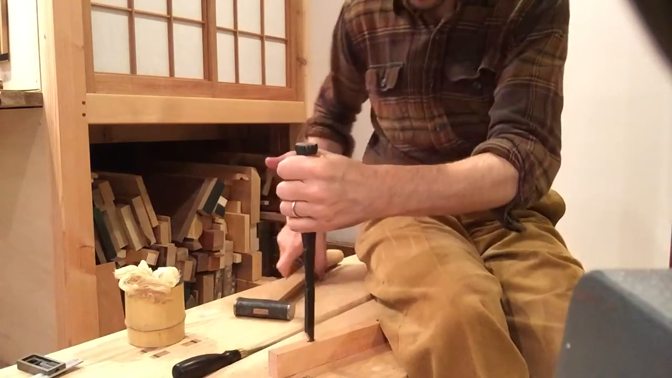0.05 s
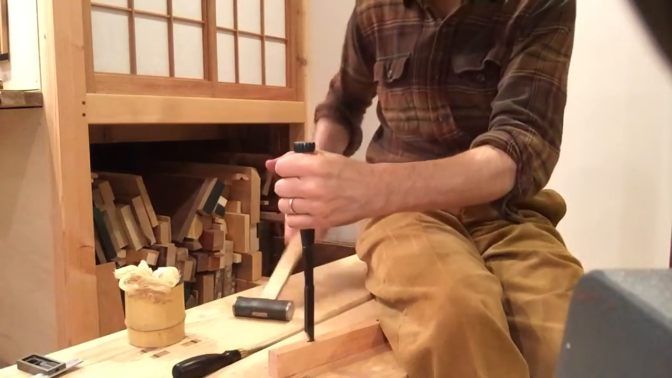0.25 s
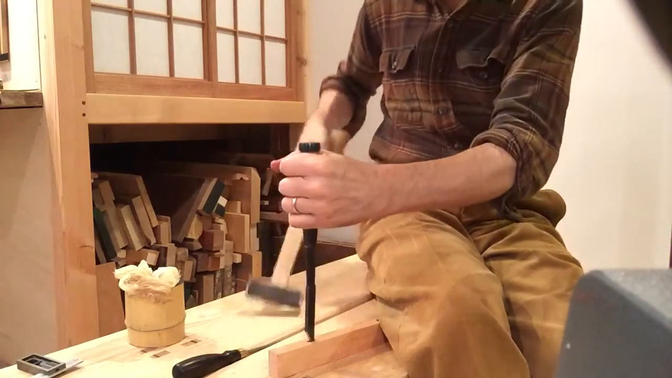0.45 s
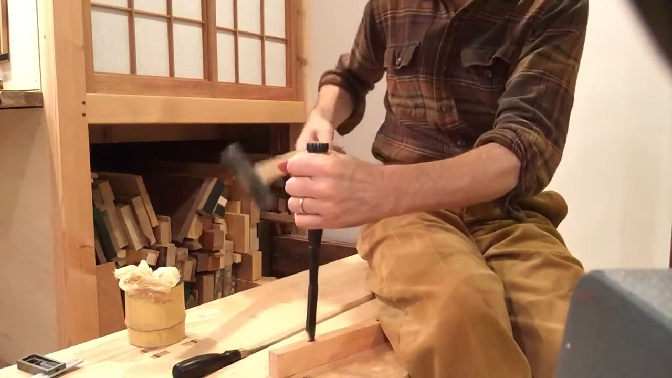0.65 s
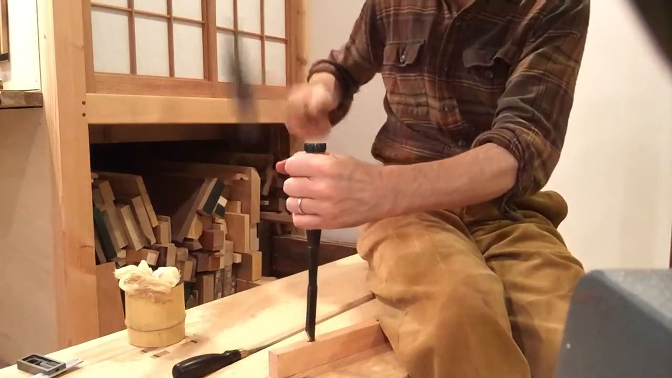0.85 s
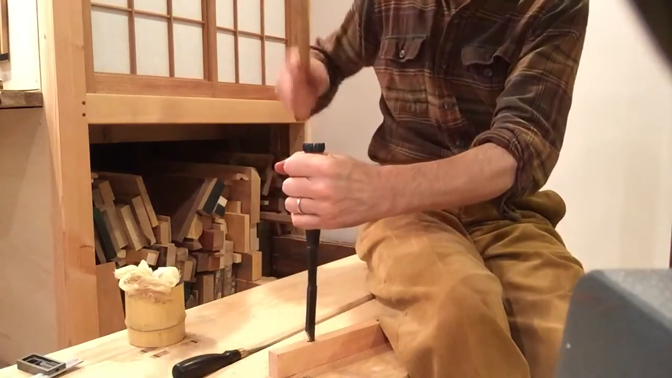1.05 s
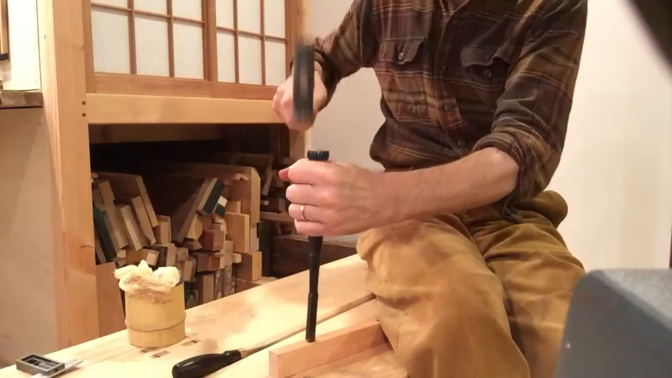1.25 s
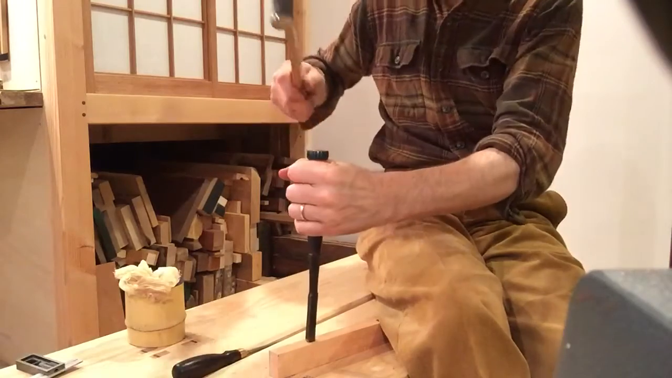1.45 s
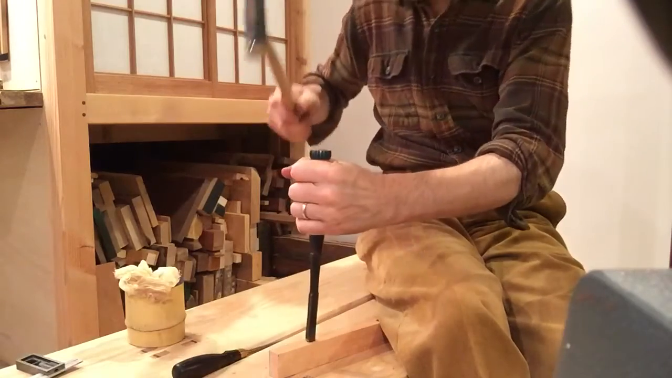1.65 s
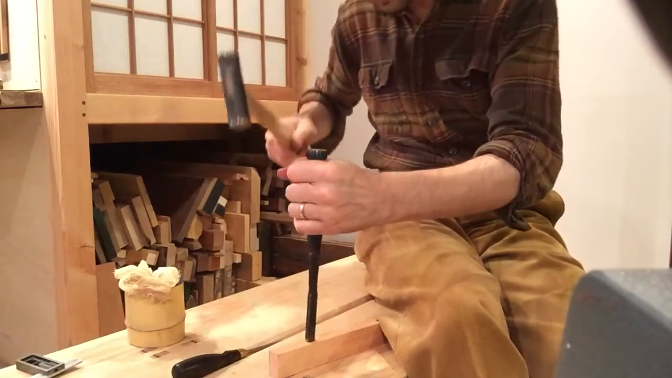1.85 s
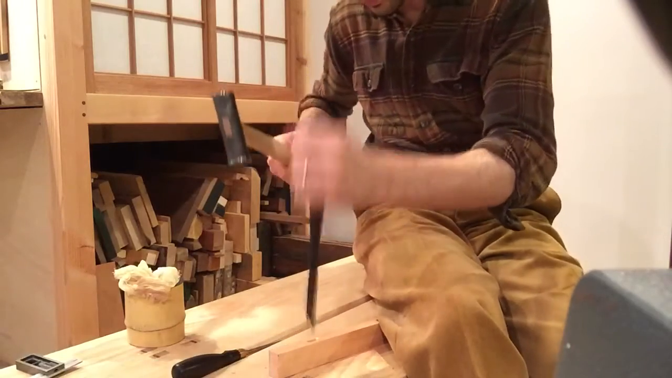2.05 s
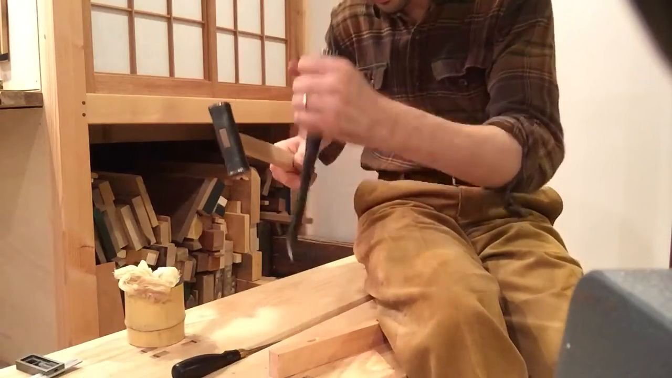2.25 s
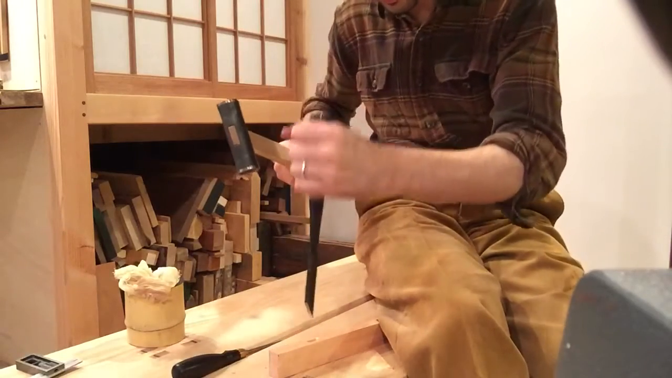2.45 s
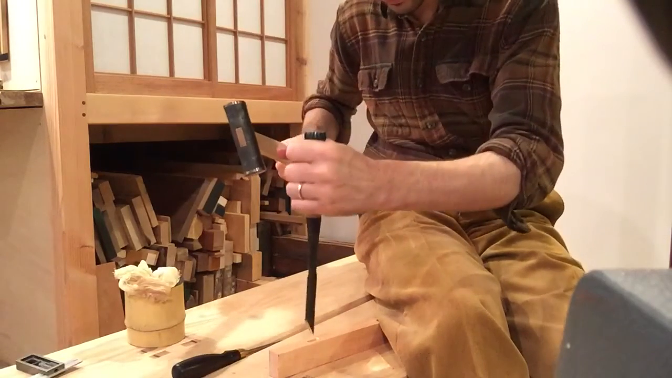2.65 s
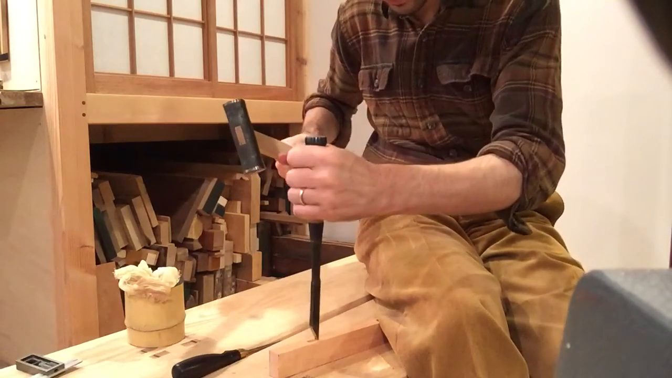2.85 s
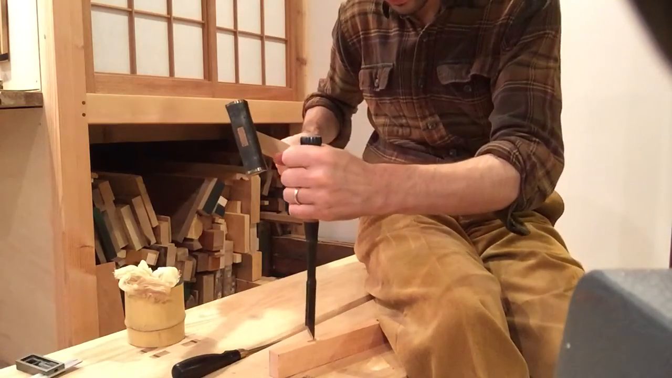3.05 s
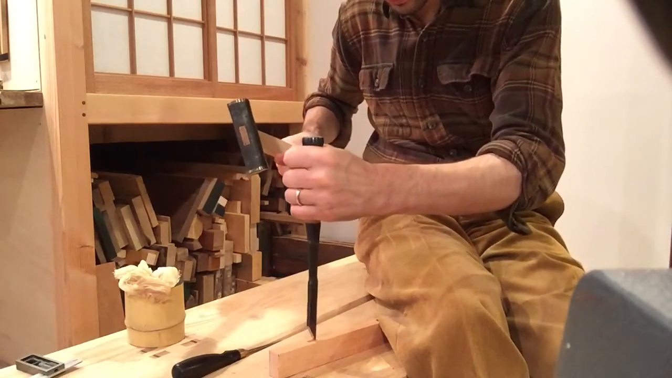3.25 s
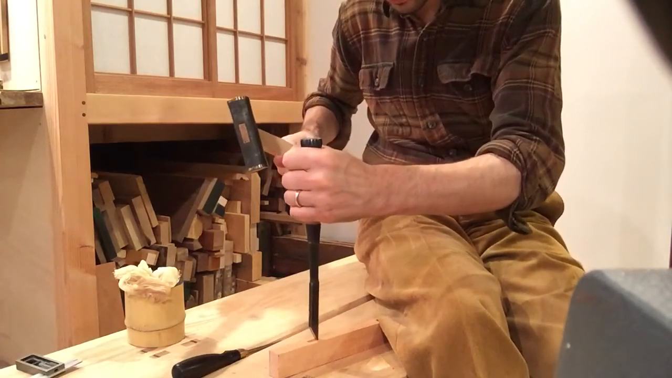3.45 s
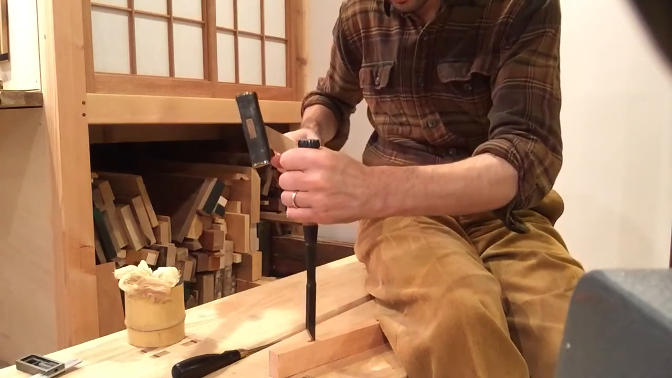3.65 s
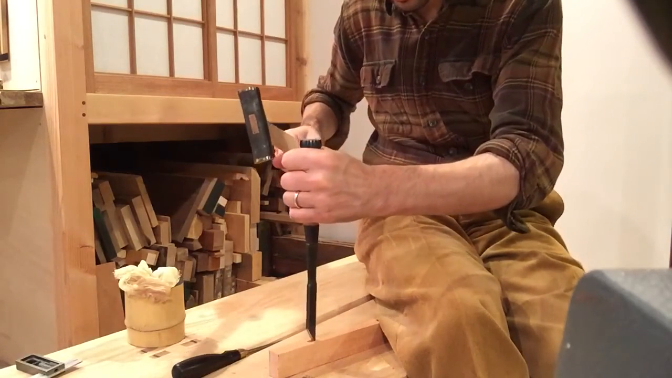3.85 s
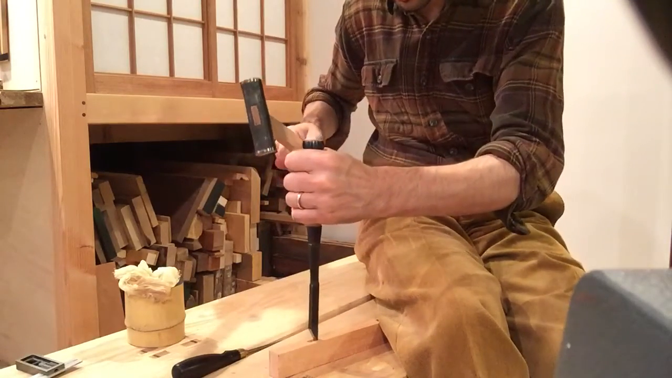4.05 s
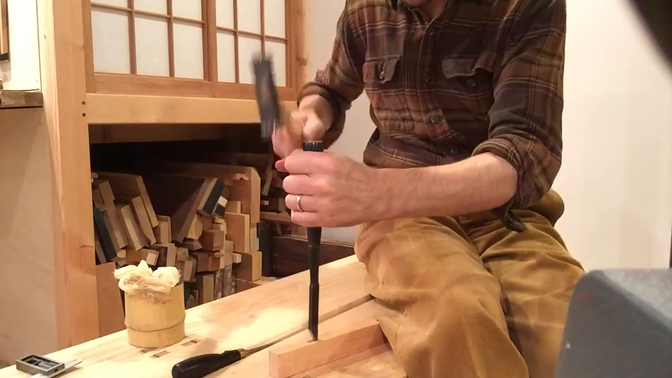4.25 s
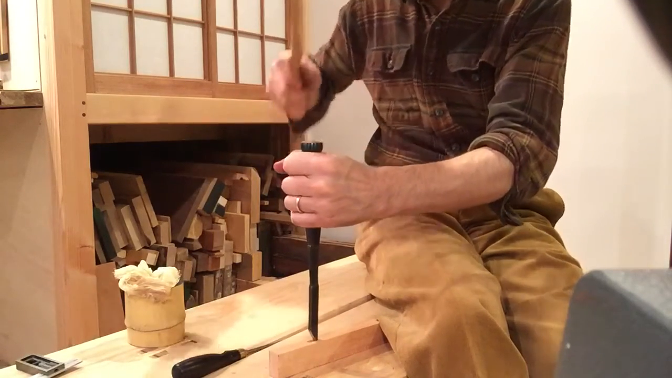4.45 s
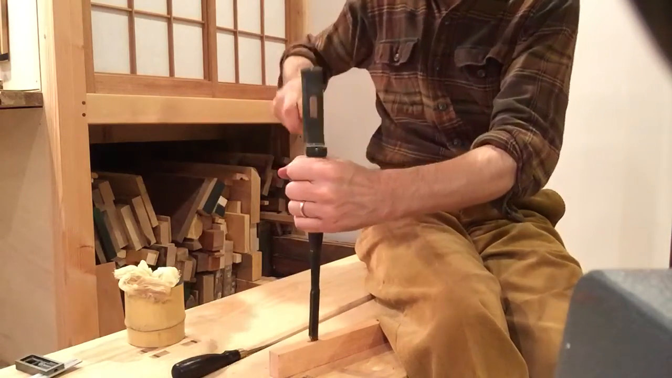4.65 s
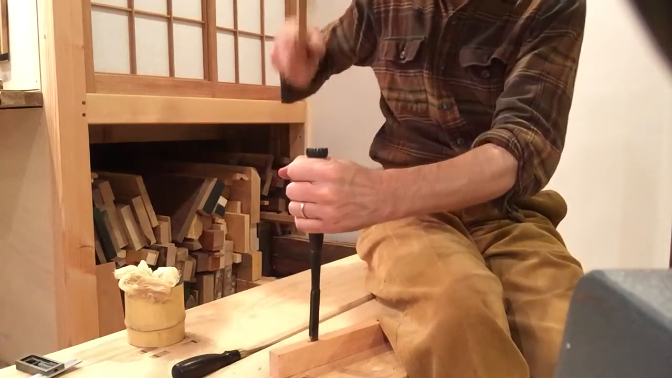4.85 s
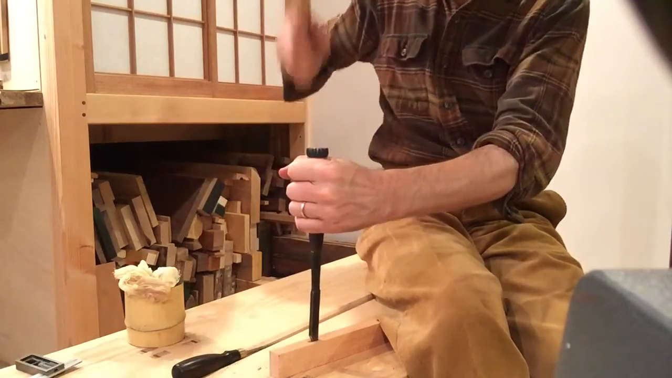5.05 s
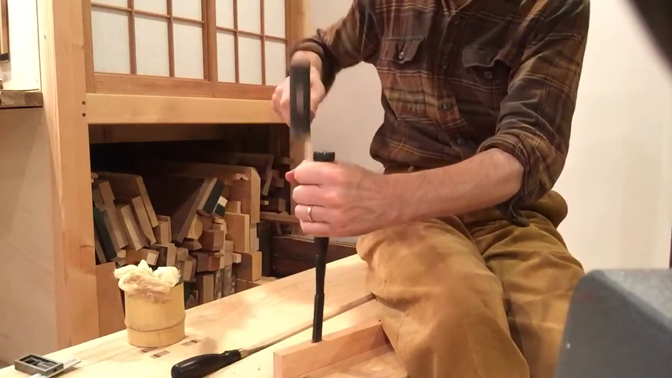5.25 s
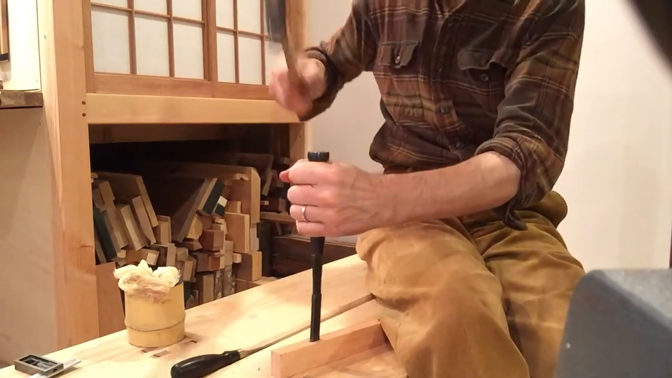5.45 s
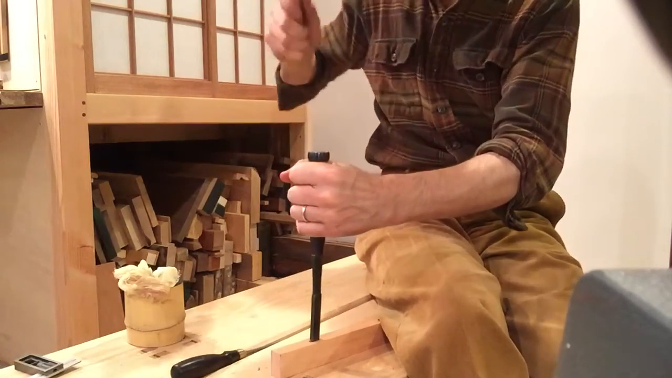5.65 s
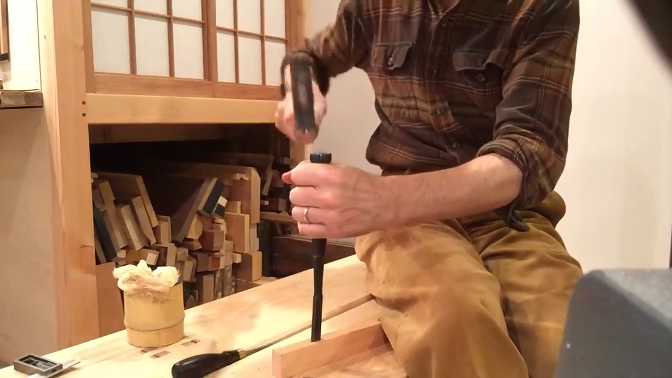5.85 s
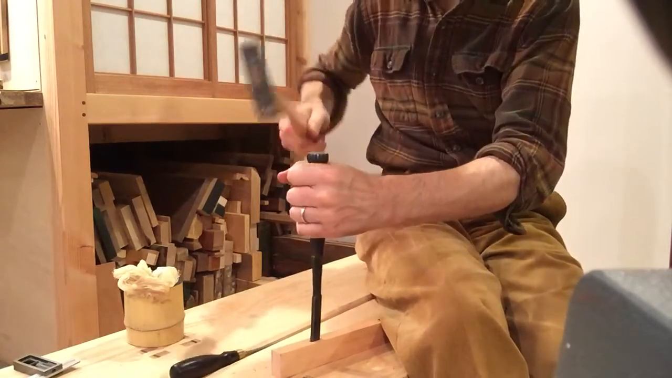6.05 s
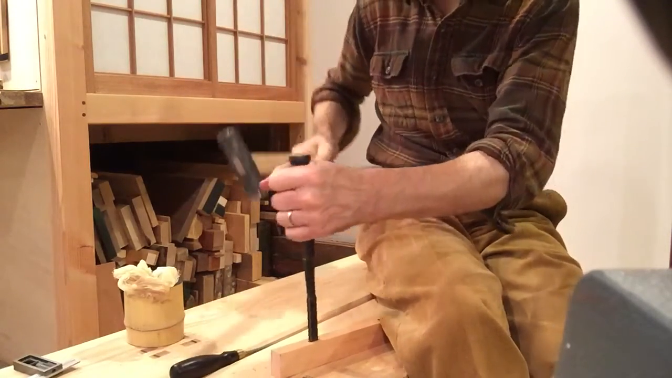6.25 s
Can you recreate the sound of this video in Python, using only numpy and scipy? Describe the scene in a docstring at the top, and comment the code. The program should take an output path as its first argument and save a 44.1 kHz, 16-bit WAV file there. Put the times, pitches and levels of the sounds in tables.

```python
"""A steel hammer is dragged off a wooden bench in a small workshop, in tiny jolts that excite the bench modes.
It drives a chisel into a beam: one blow rings bench, wooden parts and steel as decaying sines plus a crack.
Then the edge is set down, nudged and rocked in soft knocks, with clinks from the loosely held blade.
Three more strong blows follow, and a much softer one just before the end. Loud blows overload the converter.
Echoes off nearby shelves follow every sound; an uneven low rumble and steady hiss lie underneath throughout."""
import sys
import numpy as np
from scipy import signal
from scipy.fft import rfft, irfft, next_fast_len
from scipy.io import wavfile
from scipy.ndimage import uniform_filter1d

SR = 44100
rng = np.random.default_rng(int(sys.argv[2]) if len(sys.argv) > 2 else 0)


def master(y):
    """Save y as 16-bit WAV."""
    cut = np.clip(np.atleast_2d(y).T, -1, 1)
    pcm = np.round(cut * 32767)  # scale
    wavfile.write(sys.argv[1], SR, pcm.astype(np.int16))


def amplitude_ratio(level_db):
    """Convert a level in decibels to the matching linear amplitude (field) ratio."""
    exponent = np.asarray(level_db, float) / 20
    return 10 ** exponent


N = 278271  # length in samples


def along(table, hz):
    """Read (f/Hz, value) points on a log-frequency axis."""
    points, values = np.transpose(table)
    return np.interp(np.log(np.maximum(hz, 1)), np.log(points), values)


def colour(x, table):
    """Filter a sound with the response given by (f/Hz, level/dB) points."""
    size = next_fast_len(len(x))
    gain = amplitude_ratio(along(table, np.fft.rfftfreq(size, 1 / SR)))
    return irfft(rfft(x, size) * gain, size)[..., :len(x)]


def unit(x):
    """Scale to an rms of 1."""
    return x / np.sqrt(np.mean(x ** 2))


def decay(t, t60):
    """Exponential fade that falls 60 dB in t60 seconds."""
    return np.exp(-np.log(1000) * t / t60)


def add(out, s, sound):
    """Mix a sound in at time s."""
    start = int(s * SR)
    out[start:start + len(sound)] += sound


# hammer blows on the chisel: (t/s, strength level/dB, bench level/dB, wooden parts level/dB), parts re strength
BLOWS = [(1.1515, 15, -25.5, -9), (4.6311, 13.5, -25, -10), (5.165, 15, -14.5, -5.5),
         (5.8224, 15, -13.5, -10), (6.2939, -21.5, -33.5, -16)]


def blows():
    """A blow is a bright crack with ringing steel; the blade driven into wood is damped, so its clink stays low."""
    crack_db, tilt_db, clink_db = 6, 2.5, -16  # tilt in dB per octave
    out = np.zeros(N + SR)
    for s, db, bench_db, wood_db in BLOWS:
        blow = contact(0, bench_db, wood_db, crack_db, tilt_db, thud_db=0)
        blow += amplitude_ratio(clink_db) * clink()
        add(out, s, amplitude_ratio(db) * blow)
    return out[:N]


# knocks of the edge set down on wood, nudged and rocked:
# (t/s, strength level/dB, bench level/dB re strength, sharpness/dB per octave)
KNOCKS = [(2.0262, -27.5, -38, -4), (2.0290, -23, -23, -30), (2.0360, -20, -4, -7.5),
          (2.7826, -38.5, -7.5, -23), (3.0174, -56, -11, -30), (3.1545, -60, -20, -5),
          (3.1600, -29, -31, -6.5), (3.3306, -42, -12, -16), (3.3420, -37.5, 5.5, -15),
          (3.4120, -68, 10, -15), (3.5935, -45, -10, -20), (3.6035, -38, -4, -7.5),
          (3.9095, -43.5, -12, -3), (3.9215, -39, -20, -8), (3.9275, -35.5, -11, -19),
          (3.9330, -41, 3.5, -10), (3.9570, -52, 13, -6), (4.1080, -67.5, 20, -9.5), (4.1300, -75, 9, -9),
          (4.2700, -58, -8, -14), (4.2850, -46.5, -10, -11)]


def knocks():
    """The wooden parts outweigh the steel in a knock; a duller contact drives the upper modes less."""
    steel_db, crack_db, thud_db = -11.5, -18, -6.5  # thud: bench tilt in dB per octave
    out = np.zeros(N + SR)
    for s, db, bench_db, tilt_db in KNOCKS:
        add(out, s, amplitude_ratio(db) * contact(steel_db, bench_db, 0, crack_db, tilt_db, thud_db))
    return out[:N]


# the loosely held blade touching a hard edge: (t/s, level/dB)
TOUCHES = [(2.9194, -62), (3.1565, -60), (3.1602, -47.5), (3.3358, -46.5), (3.5990, -53), (3.6030, -45.5),
           (3.9253, -32.5)]


def touches():
    """A loosely held blade is free to clink, with a short crack at the touch."""
    out = np.zeros(N + SR)
    for s, db in TOUCHES:
        add(out, s, amplitude_ratio(db) * (clink() + amplitude_ratio(-4) * crack(t60=0.0036, split_db=-11)))
    return out[:N]


# resonances of each struck object: (f/Hz, level/dB, t60/s)
BENCH = [(75, -15.5, 0.09), (135, -16, 0.034), (196.3, -1.5, 0.09), (228, -9, 0.11), (284, 0, 0.13),
         (298, -7.5, 0.18), (363, -10, 0.046), (412, -11, .05), (500.5, -6, 0.086), (574, -12.5, .05),
         (780.3, -18.5, 0.061), (930, -18.5, 0.029)]
WOOD = [(655, -5.5, 0.033), (737, -2, .016), (840, -1.5, 0.022), (949, 4.5, 0.02), (1282, -3, 0.039),
        (1480, 0, 0.021), (1540, 4.5, 0.019), (1698, 4, 0.015), (1880, -12.5, 0.0056)]  # the chisel's wooden parts
STEEL = [(2285, -3, 0.015), (2516, -1.5, 0.019), (2787, -3, 0.019), (2910, -1, 0.02), (3110, 5, .015),
         (3358, -0.5, 0.019), (3654, -4, 0.014), (3980, -6, 0.0061)]


def contact(steel_db, bench_db, wood_db, crack_db, tilt_db, thud_db):
    """Every contact rings the same objects; the heavy bench is slow to start moving."""
    bench = ring(BENCH, rise_s=0.0019, scatter_db=3.5, detune=0.022, tilt_db=thud_db)
    wood = ring(WOOD, rise_s=0.0004, scatter_db=1.5, detune=0.015, tilt_db=tilt_db)
    steel = ring(STEEL, rise_s=0.0002, scatter_db=1.5, detune=0.012, tilt_db=tilt_db)
    click = crack(t60=0.006, split_db=-20)
    return amplitude_ratio(bench_db) * bench + amplitude_ratio(wood_db) * wood + amplitude_ratio(steel_db) * steel + amplitude_ratio(crack_db) * click


# upper resonances of the blade: (f/Hz, level/dB, t60/s)
BLADE = [(2448, -3, 0.028), (2570, -2, 0.02), (2700, 0, 0.016), (4450, -6.5, .006), (7330, -4, 0.015),
         (11345, -4.5, 0.006)]


def clink():
    """The blade's upper modes, excited almost at once."""
    return ring(BLADE, rise_s=0.0001, scatter_db=3, detune=0.0029)


def ring(modes, rise_s, scatter_db, detune, tilt_db=0):
    """One strike: its place varies each mode's share and pitch; a soft contact (tilt < 0) favours low modes."""
    t = np.arange(SR // 2) / SR
    hz, db, t60 = np.transpose(modes)[:, :, None]
    pitch_chance, share_chance = rng.standard_normal((len(modes), 2)).T[:, :, None]
    waves = np.sin(2 * np.pi * hz * (1 + detune * pitch_chance) * t) * decay(t, t60)
    shares = amplitude_ratio(db + scatter_db * share_chance + tilt_db * np.log2(hz))
    body = np.sum(shares * waves, axis=0) / np.sqrt(np.sum(shares ** 2))
    return (1 - np.exp(-t / rise_s)) * body


# spectrum of a crack, also of the sleeve rustle: (f/Hz, relative level/dB)
CRACK = [(1500, -25.5), (3000, 2.5), (4200, 4), (5200, -4), (6500, -2), (7800, -1.5), (9500, -15.5),
         (11500, -14), (14000, -14), (16000, -20), (19000, -44.5)]


def crack(t60, split_db):
    """The contact as one bright click, in a short burst of noise from splitting fibres; peak of 1."""
    t = np.arange(SR // 2) / SR
    push = amplitude_ratio(split_db) * rng.standard_normal(len(t)) * decay(t, t60)
    push[12] += 1  # the click itself
    click = colour(push, CRACK) * (t < 0.1)
    return click / np.max(np.abs(click))


# hammer head and handle sliding over the bench:
# (start t/s, length/s, drive level/dB, chatter f/Hz at the start, chatter f/Hz at the end)
SLIDES = [(-0.01, 0.045, -67.5, 280, 280), (0.013, 0.055, -55.5, 920, 950), (0.155, 0.025, -59, 950, 950),
          (0.199, 0.255, -61.5, 294, 257), (0.339, 0.1, -49.5, 465, 690)]


def drag():
    """Sliding steel catches on the grain in tiny jolts; bench modes near the gliding chatter are driven most."""
    jolts_per_s, chatter_db_per_octave = 830, -20.5  # modes away from the chatter are driven less
    attack, release_s = 0.61, 0.01  # share of the length spent gathering speed; fade after the end
    t = np.arange(SR) / SR
    jolts = unit(rng.standard_normal(SR) * (rng.random(SR) < jolts_per_s / SR))
    out = np.zeros(N)
    for start, length, db, from_hz, to_hz in SLIDES:
        done = np.clip((t - start) / length, 0, 1)
        gather = np.minimum(done / attack, 1)
        stop = np.clip((start + length - t) / release_s + 1, 0, 1)
        push = jolts * amplitude_ratio(db) * gather * stop
        chatter_hz = from_hz * (to_hz / from_hz) ** done
        for mode in BENCH[2:]:  # all but the two lowest
            octaves = np.log2(mode[0] / chatter_hz)
            share = amplitude_ratio(chatter_db_per_octave * np.abs(octaves))
            body = ring([mode], rise_s=0.001, scatter_db=0, detune=0)
            body = body / np.sqrt(np.sum(body ** 2))
            # half the mode's dB, so the bench modes are closer in level than in a strike
            out[:SR] += amplitude_ratio(mode[1] / 2) * signal.fftconvolve(push * share, body)[:SR]
    return out


# sleeve brushing: (centre t/s, level/dB)
RUSTLES = [(0.034, -73.5), (0.182, -74.5), (0.35, -73), (0.686, -76)]


def rustles():
    """Cloth friction as bright noise in soft bell-shaped swells."""
    t = np.arange(SR) / SR
    swells = sum(amplitude_ratio(db) * np.exp(-((t - s) / 0.04) ** 2) for s, db in RUSTLES)  # 40 ms to 1/e
    out = np.zeros(N)
    out[:SR] = unit(colour(rng.standard_normal(SR), CRACK)) * swells
    return out


# reverberation time of the diffuse tail: (f/Hz, t60/s)
ROOM_T60 = [(100, 0.44), (250, 0.57), (700, 0.39), (1400, 0.58), (2000, 0.52), (3000, 0.46), (6000, 0.51),
            (9000, 0.39), (15000, 0.11)]


def room(x, wet_db, gap_s, build_s, early_db, early_t60, patchy_db):
    """After a short gap, strong echoes off nearby shelves fade into a diffuse tail that dies band by band."""
    t = np.arange(SR) / SR
    hz, frames, cells = signal.stft(rng.standard_normal(len(t)), SR, nperseg=256)
    cells = cells / np.sqrt(np.abs(cells))  # so many paths that no band stands out for long
    fade = decay(frames, along(ROOM_T60, hz)[:, None])
    tail = signal.istft(cells * fade, SR)[1][:len(t)]
    tail = tail * (1 + amplitude_ratio(early_db) * decay(t, early_t60))
    clumps = unit(uniform_filter1d(rng.standard_normal(SR), size=130))
    tail = tail * amplitude_ratio(patchy_db * clumps)  # echoes arrive in clumps
    tail = tail * (1 - np.exp(-np.maximum(t - gap_s, 0) / build_s))
    tail = tail / np.sqrt(np.sum(tail ** 2))
    return x + amplitude_ratio(wet_db) * signal.fftconvolve(x, tail)[:N]


# spectrum of the background noise: (f/Hz, relative level/dB)
FLOOR = [(24, -33), (40, -15), (118, -2.5), (140, -18.5), (159, -33), (194, -23.5), (467, -32), (542, -31),
         (715, -31.5), (1240, -33), (2840, -35.5), (6020, -37.5), (16000, -45)]


def floor():
    """Building rumble that swells unevenly, over the steady hiss of the electronics."""
    noise = unit(colour(rng.standard_normal(N), FLOOR))
    rumble = signal.sosfilt(signal.butter(2, 160, fs=SR, output="sos"), noise)
    swell = unit(uniform_filter1d(uniform_filter1d(rng.standard_normal(N), 1500), 1500))
    swell_gain = amplitude_ratio(2 * swell)  # 2 dB rms
    return amplitude_ratio(-62.5) * (noise + (swell_gain - 1) * rumble)


def scene():
    """Contacts and drag in the room, with the deep bass cut by the microphone's high-pass, over the floor."""
    sources = blows() + knocks() + touches() + drag() + rustles()
    near = signal.sosfilt(signal.butter(2, 70, "high", fs=SR, output="sos"), sources)
    wet = room(near, wet_db=-7.5, gap_s=0.004, build_s=0.0014, early_db=17, early_t60=0.28, patchy_db=2.5)
    return (wet + floor())[None]


def band_limit(x):
    """A steep low-pass at the top of the band."""
    return signal.sosfilt(signal.butter(12, 16460, fs=SR, output="sos"), x)


def record(dry):
    """The converter squashes everything near full scale."""
    knee = 9.5  # higher = harder corner at full scale
    squashed = dry / (1 + np.abs(dry) ** knee) ** (1 / knee)
    return band_limit(squashed)


dry = scene()
out = record(dry)
master(out)
```